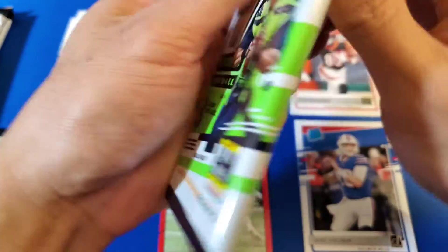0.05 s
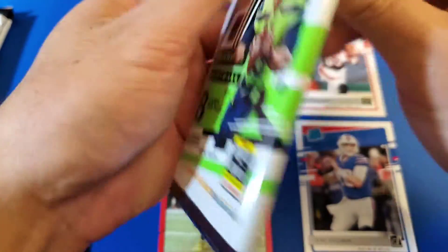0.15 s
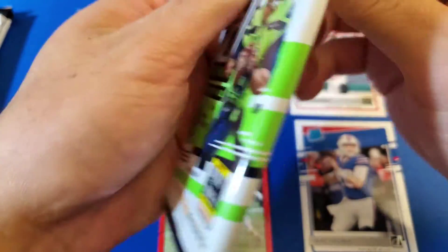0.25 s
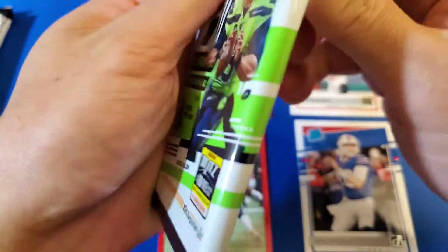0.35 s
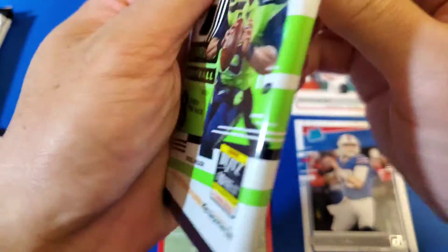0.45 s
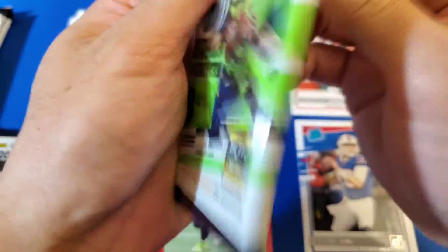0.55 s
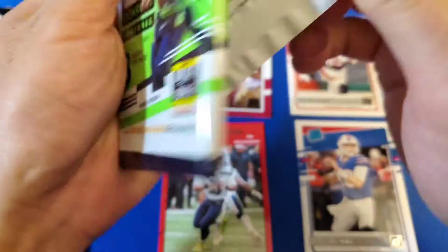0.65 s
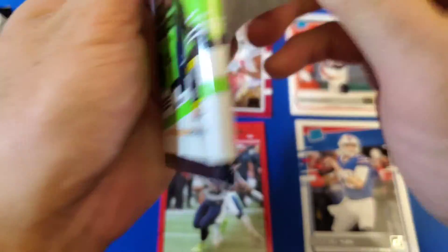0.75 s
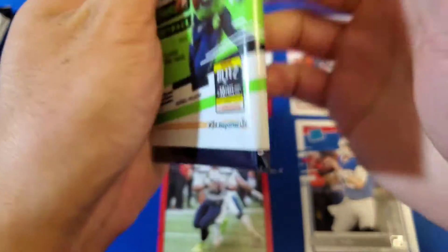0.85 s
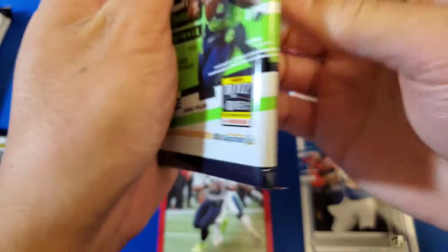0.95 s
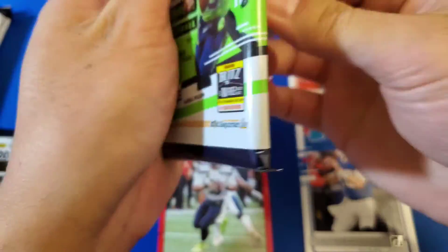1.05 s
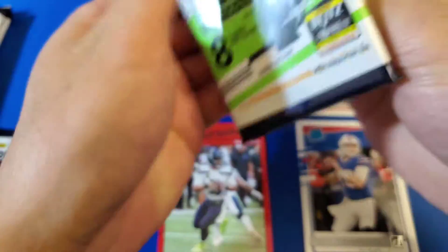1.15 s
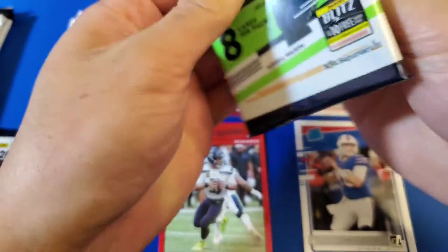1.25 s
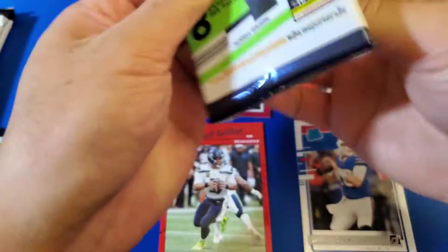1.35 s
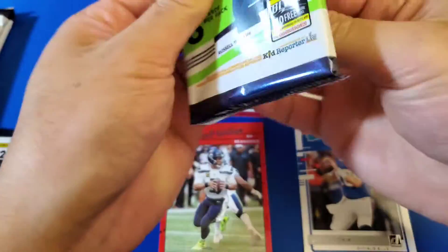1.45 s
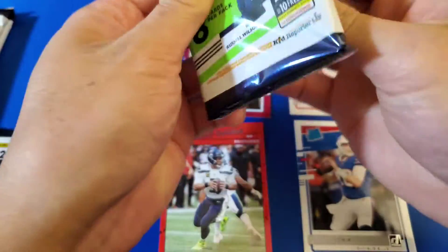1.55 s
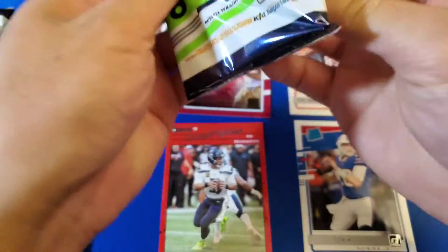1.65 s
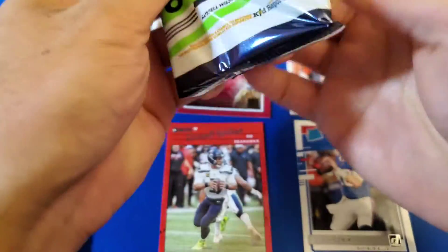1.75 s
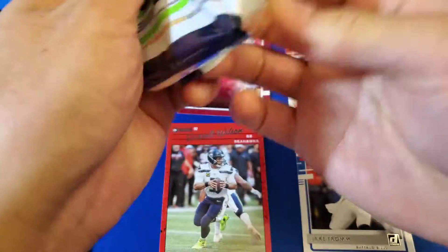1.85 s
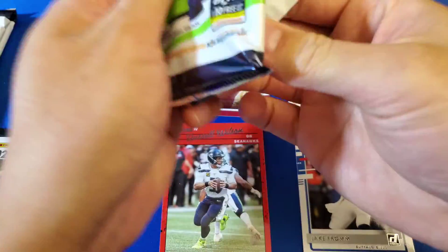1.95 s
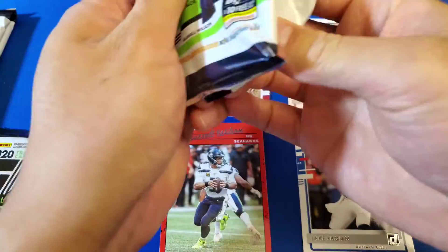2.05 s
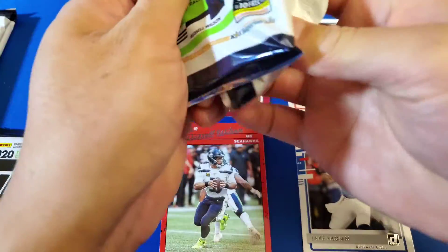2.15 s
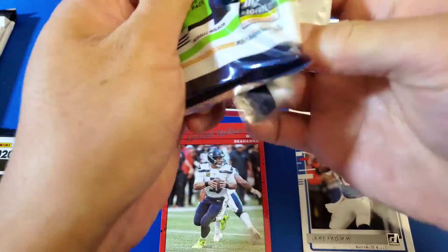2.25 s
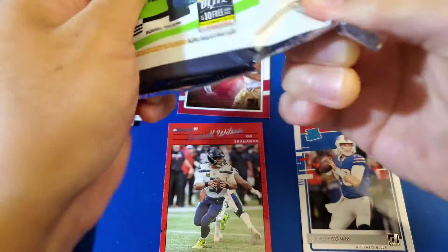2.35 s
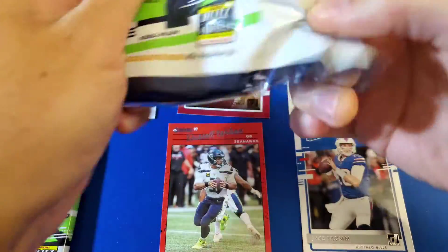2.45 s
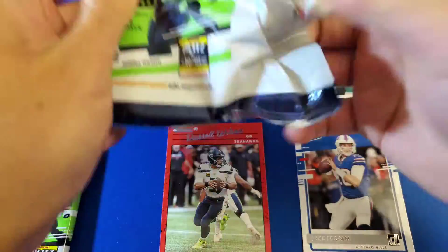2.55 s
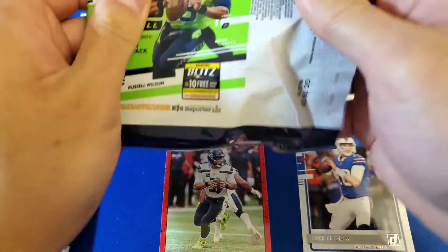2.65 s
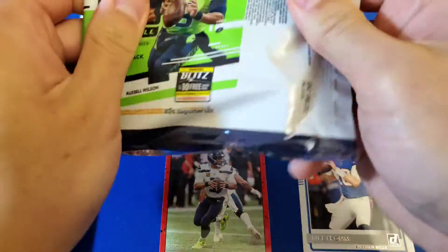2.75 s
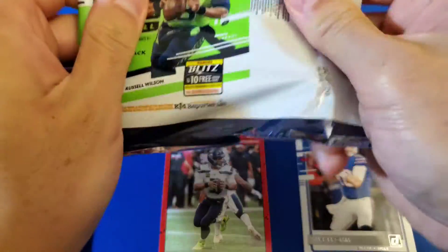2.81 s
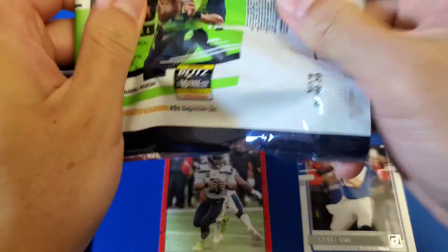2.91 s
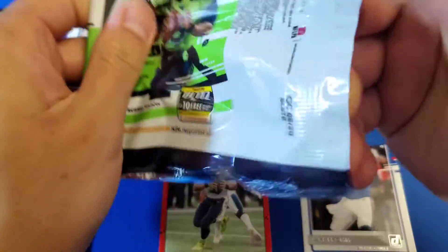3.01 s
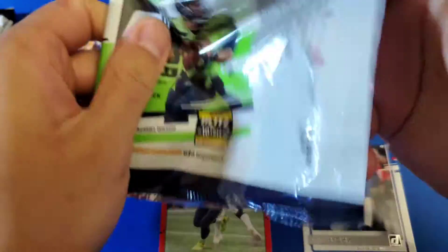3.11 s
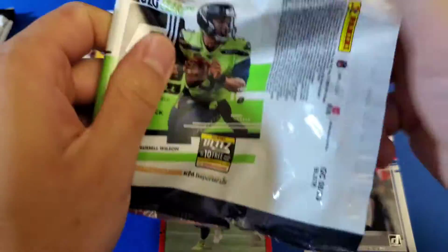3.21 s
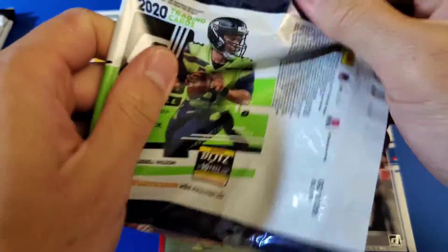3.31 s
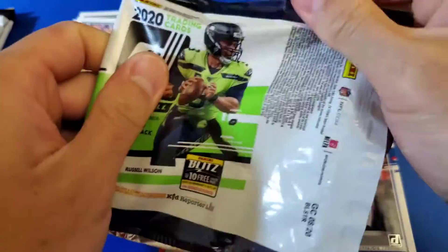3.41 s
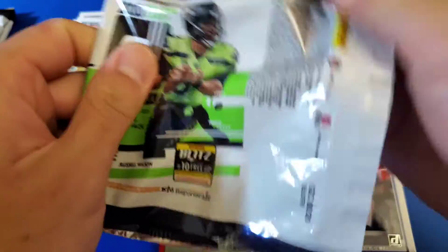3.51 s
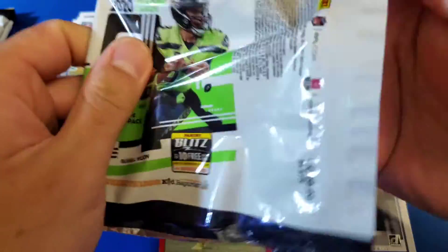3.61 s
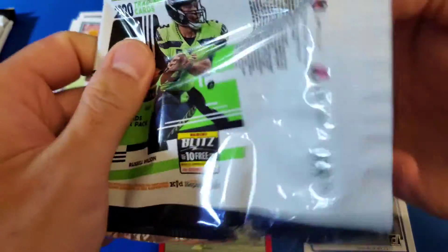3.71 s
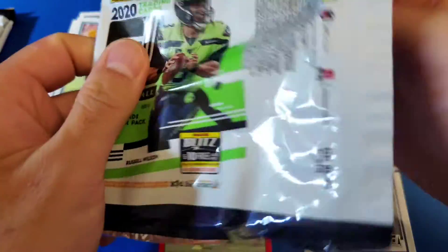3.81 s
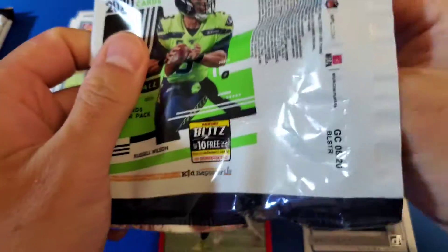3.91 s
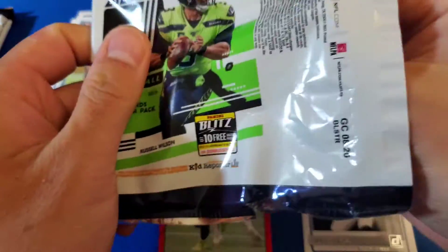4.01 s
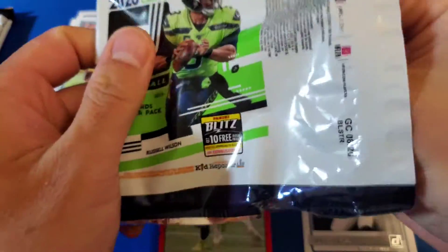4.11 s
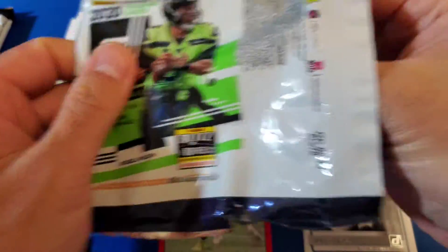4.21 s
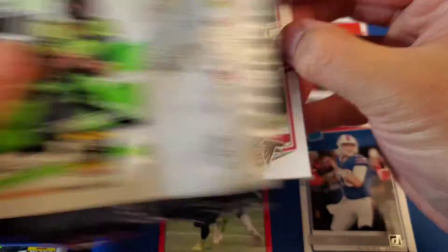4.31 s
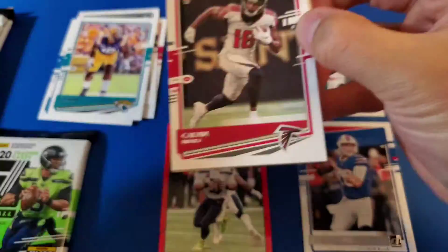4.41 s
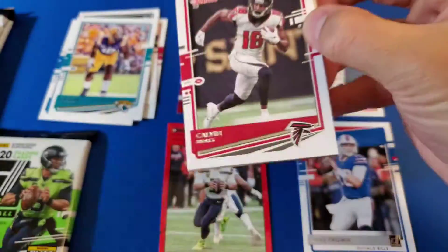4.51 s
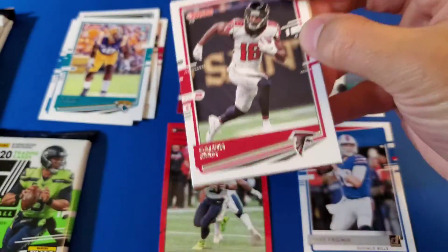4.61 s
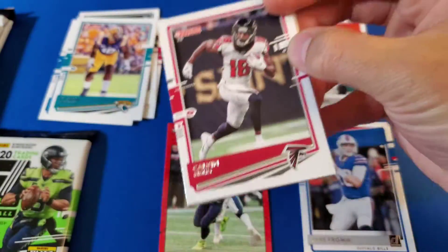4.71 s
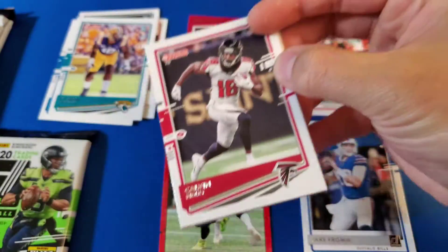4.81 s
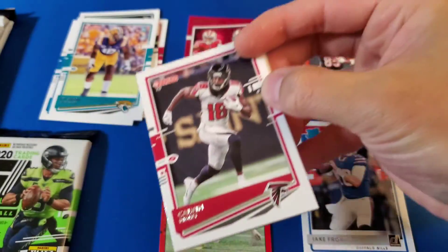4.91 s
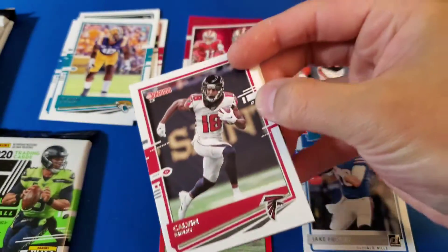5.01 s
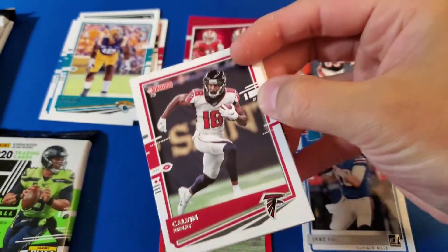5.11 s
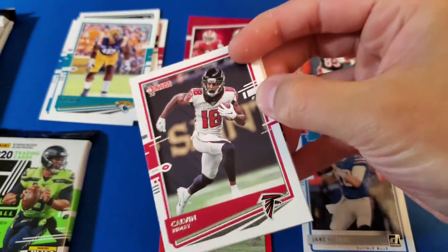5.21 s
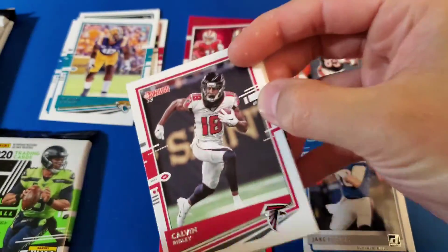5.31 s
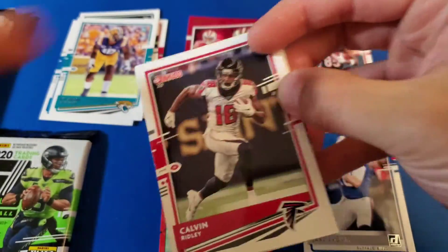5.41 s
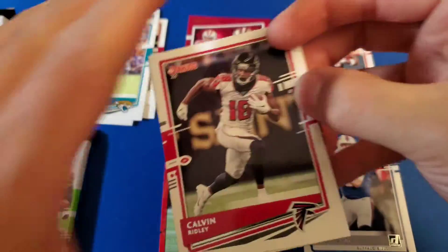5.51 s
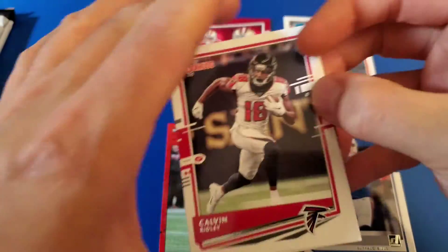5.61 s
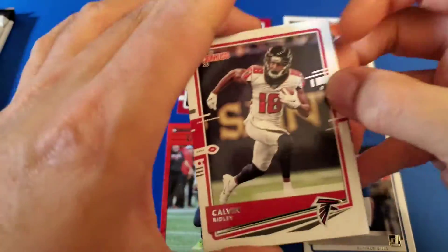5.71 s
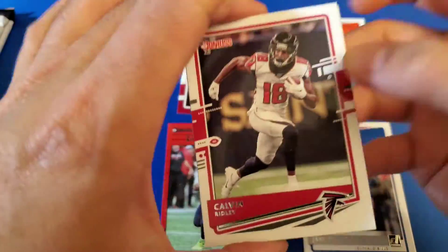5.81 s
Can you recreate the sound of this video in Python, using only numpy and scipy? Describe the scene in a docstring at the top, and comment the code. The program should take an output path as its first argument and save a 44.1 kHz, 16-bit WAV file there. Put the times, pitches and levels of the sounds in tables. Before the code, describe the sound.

Two hands turn and squeeze a foil card pack very close to the microphone, giving scattered sharp snaps and fine crackle. The crinkling thickens into ripping after two seconds, then fuller, boxier crumples as the wrapper opens. It stops around four and a half seconds; quiet finger taps on cards and a faint hand slide follow. Small dry room, low wavering hum and slight hiss.

```python
"""A foil card pack is turned, torn and spread by two hands: creases in its film buckle with sharp snaps,
each a decaying noise burst through a resonance, amid a dense crackle of random small buckles.
Each snap shoves the pack, whose modes ring briefly; bumps pass into the table. Later, fingers tap and
brush the cards and a hand slides over a mat as band-limited noise. Resonant noise and motor tones form
a low wavering hum, over faint hiss. Feedback delays make a small room; lasting loudness ducks the bass."""
import sys
import numpy as np
from scipy import signal
from scipy.fft import rfft, irfft, next_fast_len
from scipy.io import wavfile
from scipy.ndimage import uniform_filter1d

SR = 44100
rng = np.random.default_rng(int(sys.argv[2]) if len(sys.argv) > 2 else 0)


def waveform_to_disk(signal):
    """Save audio, clipped to [-1, 1], as 16-bit WAV at the path in sys.argv[1]."""
    frames = np.transpose(np.atleast_2d(signal))
    scaled = np.clip(frames, -1, 1) * 32767
    samples = np.round(scaled).astype(np.int16)
    wavfile.write(sys.argv[1], SR, samples)


N = 258469

# Levels are relative: film, pack, ports and room act on them afterwards.
# hum strength: start_s, level_db
HUM_LEVEL = [(0.0, -47.5), (0.15, -43), (0.8, -51.5), (3.1, -50), (5.81, -48.5), (5.86, -46)]
# hum resonances: pitch_hz, width_hz, level_db
HUM_TONES = [(54.6, 6.6, 4), (114.2, 7.8, -8.5), (139, 18, -13.5), (307, 63, -26)]
# hiss spectrum: frequency_hz, density_db (per Hz)
HISS_SPECTRUM = [(250, 9.5), (400, 9), (800, -1.5), (1400, -10.5), (1900, -2.5), (2800, -12), (14000, -14)]
# rising and falling crackle of handling: start_s, level_db
HANDLING_LEVEL = [(0.0, -58), (0.11, -57), (0.29, -50.5), (0.51, -45.5), (0.67, -50), (1.23, -43),
                  (2.1, -41), (2.22, -32), (2.37, -42), (2.51, -30.5), (2.81, -67), (2.97, -39.5),
                  (3.7, -45.5), (4.06, -60.5), (4.41, -46), (4.6, -94)]
# pack's share against the crackle, more booming once open: start_s, share_db
OPENING_SHARE = [(0, -17), (.9, -4), (1.5, -6.5), (2.3, -8), (2.8, 5.5), (3.6, 0), (4.6, -5.5)]
# runs of creases giving way together, as when the seam rips:
# start_s, length_s, first_db, last_db, pack_share_db (against the crackle)
RIPS = [(0.063, 0.093, -51, -36.5, -29), (0.426, 0.096, -34, -30, -38.5), (0.683, 0.067, -20.5, -14.5, -6),
        (2.374, 0.13, -22.5, -29.5, -2.5), (2.704, .05, -32.5, -28.5, -2.5),
        (2.817, 0.028, -39, -25.5, 4.5), (2.905, 0.053, -28, -44, 8.5), (3.609, 0.048, -52, -27, -7),
        (4.29, 0.067, -56, -38, -2)]
# single creases buckling: start_s, peak_db, pitch_hz, thump_db (against the snap), pan_db (left minus right)
SNAPS = [(0.0817, -29, 4300, -32, 6.5), (0.1024, -21.5, 12100, -34, 4), (0.1442, -10, 4100, -20, 1),
         (0.1556, -7, 3750, -28, 2), (0.175, -14.5, 4140, -14, -6), (0.252, -12.5, 2360, -21, -1.5),
         (0.3195, -18.5, 4630, -40, 2), (0.4098, -29.5, 5310, -27, 11), (0.4238, -15.5, 5410, -35, -6),
         (0.4453, -16, 3420, -26.5, -0.5), (0.4593, -8.5, 1904, -25, -5.5), (0.5, -1.5, 2880, -26, 7),
         (0.5139, -12, 3100, -20, -0.5), (0.5808, -19, 3000, -42, 1.5), (0.62, -29, 3150, -30.5, -6),
         (0.6789, -14.5, 3200, -36.5, -11), (0.7034, -11, 1870, -7.5, 1), (0.741, -1, 3110, -17, -1),
         (0.8258, -11.5, 9400, -23, -1), (0.8479, -10, 4330, -43, -2), (0.896, -13.5, 2880, -13, -1),
         (0.9654, -8, 1840, -15.5, 0.5), (0.9934, -15.5, 1450, -14, -6), (1.0271, -43, 2190, -24, -5),
         (1.0397, -16.5, 3400, -42, 2), (1.1184, -42, 1850, 7, -4), (1.144, -15.5, 11000, -9.5, -4.5),
         (1.1502, -21.5, 3530, -6.5, -3.0), (1.2064, -11.5, 3450, -20, -2), (1.2144, -25.5, 3140, -7, 5),
         (1.2475, -5.5, 3780, -14.5, -2.5), (1.2636, -22.5, 4010, -36, 17), (1.4107, -22, 4550, -23, 3),
         (1.4287, -19, 12300, -14, -8), (1.492, -19.5, 3680, -11, -0.5), (1.5315, -13.5, 2400, -20, 2),
         (1.5597, -16, 2760, -1, -2.0), (1.6381, -15, 2370, -6, -1), (1.7075, -20, 3440, -28.5, 5.5),
         (1.7335, -2, 1830, -13.5, 0.0), (1.7576, -8.5, 5250, -17, -1.0), (1.8568, -16, 1820, -40, -9.5),
         (1.871, -19.5, 5350, -37.5, 4), (1.8966, -16, 6390, -24, 0.5), (1.9085, -21, 6660, -22, -3),
         (1.929, -14, 9030, -32.5, 0.5), (1.94, -12.5, 3410, -15.5, 0.5), (1.964, -15, 3530, -16.5, -5.5),
         (1.9931, -5, 2610, -15, -4), (2.0566, -11, 1905, -15.5, -5.5), (2.1253, -24, 1800, -33.5, -1),
         (2.143, -2.5, 1780, -15, 2), (2.171, -13.5, 9390, -22, 0), (2.1846, -12, 9440, -20.5, -7),
         (2.195, -20, 9040, -21, -9), (2.2169, -12, 7660, -12, 0), (2.2389, -7, 4560, -19.5, -6.5),
         (2.2744, -19.5, 3120, -10.5, -1.5), (2.316, -22, 5590, -24, -1.5), (2.3478, -12, 9390, -20, -3.5),
         (2.371, -11, 2250, -31.5, -1), (2.3904, -6, 4540, -19, 4), (2.4108, -3, 2660, -21, -6.5),
         (2.4435, -8.5, 1820, -19, 3.5), (2.4527, -2, 6090, -13.5, -1.5), (2.5247, -3, 8840, -17, -0.5),
         (2.5727, -15, 2570, -13.5, 1), (2.5889, -13.5, 7530, -25.5, -0.5), (2.6418, -30, 6620, 5.5, 0.5),
         (2.6678, -18, 6200, -21, 1), (2.7085, -3, 3150, -5, 4), (2.7264, -26, 2970, -17, -2),
         (2.7417, -8, 2510, -10.5, 0.5), (2.8212, -7, 2550, -9, -1), (2.8403, -8, 12500, -29.5, -1),
         (2.8462, -10, 4410, -16.5, 5.5), (2.8617, -9.5, 2460, -16.5, 1), (2.8854, -29.5, 3490, -13.5, 4),
         (2.909, -2.5, 4330, -8.5, 2), (2.9368, -13, 3410, -9, 6.5), (2.9557, -12, 5120, -23, 3.5),
         (2.9721, -13, 2520, -9.5, 3), (2.9935, -23.5, 1950, -15, 0), (3.046, -24.5, 4060, -18.5, 16.5),
         (3.057, -17, 6710, -28.5, 0), (3.0749, -11, 2730, -32.5, 1.5), (3.1038, -3.5, 4820, -20.5, -9),
         (3.1264, -15, 2580, -26.5, 4.5), (3.1663, -6.5, 2430, -15.5, 1), (3.1873, -10.5, 6080, -18.5, 8),
         (3.2123, -12.5, 9680, -26, 1.5), (3.241, -12, 3610, -32.5, -3), (3.2619, -17, 2460, -28.5, -6),
         (3.3704, -12.5, 2900, -26, 0.5), (3.4053, -1.5, 5170, -13.5, -2), (3.4129, -5, 3500, -11.5, -0.5),
         (3.4236, -10.5, 3650, -24.5, -0.5), (3.47, -13.5, 2690, -9.5, 3.0), (3.48, -3.5, 13000, -18, 0.5),
         (3.493, -6, 2750, -14.5, 0.5), (3.5134, -27, 2320, -30, -1.5), (3.5359, -14, 2610, -25, -2),
         (3.6101, -12, 2610, -13.5, 5), (3.653, -16.5, 2060, -11, 6), (3.6796, -12.5, 4100, -30, -4),
         (3.7544, -7.5, 3640, -50, 0.0), (3.7863, -13.5, 1960, -37, 5.5), (3.7962, -18.5, 1820, -16, 3.5),
         (3.8352, -8.5, 3430, -10.5, 1.5), (3.9673, -16, 3590, -17.5, -2.5), (4.146, -39.5, 6700, -32, 16),
         (4.2541, -20.5, 8500, -30, 2), (4.304, -19, 8620, -21, 7), (4.3944, -18, 1600, -3.5, -2),
         (4.4054, -17.5, 3180, -7, 7), (4.4258, -30, 3530, -17, 5), (4.4621, -8.5, 5100, -15, -2.5)]
# radiation spectrum of the film: frequency_hz, density_db (per Hz)
FILM_SPECTRUM = [(120, -40.5), (200, -17.5), (940, -4.5), (1650, -6.5), (1840, -0.5), (2020, -3),
                 (3120, -2), (7220, -4.5), (8820, -2), (14200, -3.5), (15500, -9.5)]
# modes of the pack: pitch_hz, width_hz, level_db
PACK_MODES = [(235.8, 121, -6), (543, 270, -3), (730, 326, 0.5), (944, 180, -1), (1286, 190, -8.5),
              (2010, 37, -26.5)]
# share of the jolting that reaches the table: start_s, share_db
TABLE_SHARE = [(0, -8), (2.4, -17), (2.7, 4.5), (3.9, 4.5), (4.5, 3)]
# fingers meeting the loose cards: start_s, tap_peak_db, tap_pitch_hz, brush_db, brush_length_s
TOUCHES = [(4.618, -39.5, 6240, -61, 0.049), (4.689, -47.5, 1760, -81, .02), (4.79, -57, 4220, -70, 0.093),
           (5.018, -42.5, 3150, -57.5, 0.009), (5.138, -44, 4260, -65, 0.09),
           (5.235, -42.5, 6400, -64.5, 0.11), (5.678, -27.5, 1690, -46.5, .01)]
# hand sliding in over the mat: start_s, level_db
SLIDE_LEVEL = [(5.4, -81), (5.5, -64.5), (5.66, -57.5), (5.86, -67)]
# bands of the slide: centre_hz, width_hz, level_db (each pass of two)
SLIDE_BANDS = [(530, 300, 2), (1800, 1100, 1)]

HISS_DB = -66
SNAP_T60_S, GRAIN_T60_S, SHOVE_T60_S = 0.022, 0.015, 0.026
BURST_SAMPLES = 1024
KICK_DB, KICK_S = 10, 0.0009  # the flip itself stands above the rattle
MAX_PORT_LAG_S = 0.0006
SETTLE_DB, SETTLE_DB_PER_S = -27.5, 299.5  # rustle after a snap, against its level
RIP_RISE_DB_PER_S, RIP_FALL_DB_PER_S = 3000.5, 700
TAP_THUMP_DB, TAP_PAN_DB = -38, 4
BRUSH_FALL_DB_PER_S, BRUSH_SHARE_DB = 145.5, -3
GRIP_DB = 8.5  # weight of the crackle's shaking among the low bumps
ROOM_T60_S, ROOM_DB, WALL_CUT_HZ = 0.21, -15.5, 1900
PORTS_ALIKE_BELOW_HZ = 410
SUPPRESS_ABOVE_DB, SUPPRESS_DEPTH_DB, SUPPRESS_BELOW_HZ = -25, 42, 290
CUTOFF_HZ = 16900


def from_db(db):
    """Logarithmic level: 20 dB is a tenfold amplitude."""
    return 10 ** (np.asarray(db) / 20)


def rms_one(x):
    """Normalisation by effective value: the rms becomes 1."""
    return x / np.sqrt(np.mean(x ** 2) + 1e-20)


def gain_curve(rows):
    """Linear interpolation of level in dB over time, given as a gain per sample."""
    start_s, level_db = np.transpose(rows)
    return from_db(np.interp(np.arange(N) / SR, start_s, level_db))


def drift(rate_hz):
    """Low-pass random fluctuation of rms 1: noise through two equal poles, run at one value per 40 samples."""
    r = np.exp(-2 * np.pi * rate_hz * 40 / SR)
    noise = rng.standard_normal(N // 40 + 2002)
    slow = signal.lfilter([1], [1, -2 * r, r * r], noise)[2000:]  # start-up left out
    return np.interp(np.arange(N) / 40, np.arange(len(slow)), rms_one(slow))


def resonance(x, hz, width_hz):
    """Damped resonator: a pole pair whose radius sets the bandwidth, with about unit gain at its peak."""
    r = np.exp(-np.pi * width_hz / SR)
    zeros = np.array([1, 0, -1]) * (1 - r * r) / 2
    return signal.lfilter(zeros, [1, -2 * r * np.cos(2 * np.pi * hz / SR), r * r], x)


def modes(x, table):
    """Modal superposition: parallel resonators with alternating signs."""
    total = 0
    for k, (hz, width_hz, level_db) in enumerate(table):
        total = total + (-1) ** k * from_db(level_db) * resonance(x, hz, width_hz)
    return total


def colour(x, spectrum, size=4096):
    """Minimum-phase filtering: folding the cepstrum onto positive time makes the response causal."""
    hz, db = np.transpose(spectrum)
    grid = np.maximum(np.arange(size // 2 + 1) * SR / size, 1)
    log_gain = np.log(from_db(np.interp(np.log(grid), np.log(hz), db)))
    cepstrum = irfft(log_gain)
    cepstrum[1:size // 2] *= 2
    cepstrum[size // 2 + 1:] = 0
    response = irfft(np.exp(rfft(cepstrum)))
    return signal.fftconvolve(x, response[None], axes=1)[:, :N]


def highpass(x, order, hz):
    """Butterworth high-pass: maximally flat above its corner."""
    return signal.sosfilt(signal.butter(order, hz, "high", fs=SR, output="sos"), x)


def hum():
    """Resonant noise excitation: narrow low bands with wavering sine motor tones on the first two."""
    mid, side = rng.standard_normal((2, N))
    pair = mid + 0.3 * side * [[1], [-1]]  # nearly alike at both ports
    wider = [(hz, 3 * width_hz, 0) for hz, width_hz, level_db in HUM_TONES]
    tones = modes(modes(pair, HUM_TONES), wider)
    t = np.arange(N) / SR
    motor = from_db(-7 + 2 * drift(2.1)) * np.sin(2 * np.pi * HUM_TONES[1][0] * t)
    motor += from_db(-12 + 1.1 * drift(2.2)) * np.sin(2 * np.pi * HUM_TONES[0][0] * t)
    return gain_curve(HUM_LEVEL) * (rms_one(tones) + motor) * from_db([[0.8], [-0.8]])


def hiss():
    """Stationary coloured noise, independent at each port."""
    noise = colour(rng.standard_normal((2, N)), HISS_SPECTRUM)
    return from_db(HISS_DB) * rms_one(highpass(noise, 2, 330))


def buckle(hz, pan_db, t60, broad=0.39, alike=0.37, cycles=3.75):
    """Snap-through instability: a crease flips, its dying rattle tuned by the size of its facet."""
    shared, left, right = rng.standard_normal((3, BURST_SAMPLES))
    n = np.arange(BURST_SAMPLES)
    fade = from_db(-60 * n / (t60 * SR))
    fade *= from_db(KICK_DB * np.exp(-n / (KICK_S * SR)))
    pair = alike * shared + np.sqrt(1 - alike ** 2) * np.array([left, right])
    pair *= fade
    pair = broad * pair + resonance(pair, min(hz, 0.4 * SR), hz / cycles)
    far = int(pan_db > 0)  # the quieter port is the farther one
    pair[far] = np.roll(pair[far], int(rng.uniform(0, MAX_PORT_LAG_S * SR)))
    return pair / np.abs(pair).max() * from_db([[pan_db / 2], [-pan_db / 2]])


def crackle(strength, shaking, per_s, spread_db, clumping_db, count):
    """Clumped random impulse process: small creases flip over many facets, most faint, a few loud."""
    heights = from_db(spread_db * np.minimum(rng.exponential(1, N), 4))
    chance = per_s * from_db(clumping_db * drift(40)) / SR
    flips = heights * rng.choice([-1, 1], N) * (rng.random(N) < chance)
    facet = rng.integers(0, count, N)
    film = np.zeros((2, N))
    for k, hz in enumerate(np.geomspace(1700, 12500, count)):
        rattle = buckle(hz, rng.normal(0, 1.7), GRAIN_T60_S)[:, :400]
        film += signal.oaconvolve((flips * (facet == k))[None], rattle, axes=1)[:, :N]
    return strength * rms_one(film), from_db(9.5) * shaking * rms_one(flips)


def handling():
    """Amplitude modulation: strength of the loose crackle and of its shaking of the pack."""
    held = np.arange(N) < HANDLING_LEVEL[-1][0] * SR
    strength = gain_curve(HANDLING_LEVEL) * held
    return strength, strength * gain_curve(OPENING_SHARE)


def burst(start_s, length_s, first_db, last_db, fall_db_per_s):
    """Exponential envelope: a steep rise, a glide from first to last level, then decay."""
    t = np.arange(N) / SR - start_s
    held_db = np.interp(t, [0, length_s + 1e-6], [first_db, last_db])
    rise_db = RIP_RISE_DB_PER_S * np.minimum(t, 0)
    fall_db = fall_db_per_s * np.maximum(t - length_s, 0)
    return from_db(held_db + rise_db - fall_db)


def rips():
    """Cascading failure: strength of runs of creases giving way, and of their shaking."""
    strength, shaking = np.zeros((2, N))
    for start_s, length_s, first_db, last_db, share_db in RIPS:
        gain = burst(start_s, length_s, first_db, last_db, RIP_FALL_DB_PER_S)
        strength += gain
        shaking += gain * from_db(share_db)
    return strength, shaking


def snaps():
    """Impulsive excitation: loud creases and taps rattle, and each gives the pack a short shove."""
    film, jolts = np.zeros((2, N + BURST_SAMPLES)), np.zeros(N + BURST_SAMPLES)
    shove_fade = from_db(-60 * np.arange(BURST_SAMPLES) / (SHOVE_T60_S * SR))
    taps = [(s, db, hz, TAP_THUMP_DB, TAP_PAN_DB) for s, db, hz, *brush in TOUCHES]
    for start_s, peak_db, hz, thump_db, pan_db in [*SNAPS, *taps]:
        at = round(start_s * SR)
        span = slice(at, at + BURST_SAMPLES)
        film[:, span] += from_db(peak_db + 3.5) * buckle(hz, pan_db, SNAP_T60_S)
        shove = rng.standard_normal(BURST_SAMPLES) * shove_fade
        jolts[span] += from_db(peak_db + thump_db + 12.5) * shove
    return film[:, :N], jolts[:N]


def settling():
    """Exponential relaxation: strength of the rustle that dies away after each snap."""
    peaks = np.zeros(N)
    for start_s, peak_db, *rest in SNAPS:
        peaks[round(start_s * SR)] = from_db(peak_db + SETTLE_DB)
    return signal.lfilter([1], [1, -from_db(-SETTLE_DB_PER_S / SR)], peaks + 1e-18)


def brushing():
    """Frictional excitation: strength of the rasp as fingers brush the cards."""
    return sum(burst(start_s, length_s, brush_db, brush_db, BRUSH_FALL_DB_PER_S)
               for start_s, tap_db, hz, brush_db, length_s in TOUCHES)


def rasping():
    """Superposed envelopes: rips, settling film and brushing drive one dense rasp and its shaking."""
    rip, rip_shaking = rips()
    settle, brush = settling(), brushing()
    shaking = rip_shaking + settle * gain_curve(OPENING_SHARE) + brush * from_db(BRUSH_SHARE_DB)
    return rip + settle + brush, shaking


def table_bumps(jolts, shakes):
    """Structure-borne transmission: jolts reach the microphone through low resonances in series."""
    push = gain_curve(TABLE_SHARE) * (jolts + from_db(GRIP_DB) * shakes) + 1e-18
    low = resonance(resonance(push, 95, 100), 130, 130)
    return low * from_db([[-2], [-11]])  # felt mostly on the left


def slide():
    """Friction noise: skin on cloth excites two broad bands, filtered twice."""
    noise = modes(modes(rng.standard_normal((2, N)), SLIDE_BANDS), SLIDE_BANDS)
    begun = np.arange(N) > SLIDE_LEVEL[0][0] * SR
    return gain_curve(SLIDE_LEVEL) * begun * rms_one(noise)


def room(x):
    """Recirculating reflections: eight feedback delays a side, duller on every round."""
    size = next_fast_len(N + SR)
    hz = np.arange(size // 2 + 1) * SR / size
    tail = np.zeros((2, len(hz)), complex)
    for k, lag_s in enumerate(rng.uniform(0.0047, 0.035, 16)):
        delay = from_db(-60 * lag_s / ROOM_T60_S) * np.exp(-2j * np.pi * hz * lag_s)
        loop = delay / (1 + 1j * hz * lag_s * 10 / WALL_CUT_HZ)  # longer paths lose more treble
        tail[k % 2] += loop / (1 - loop) * (-1) ** (k // 2)
    return irfft(rfft(x, size) * tail, size)[:, :N]


def ports(x):
    """Wavelength against spacing: long waves reach both ports alike; the left is shaded in the top treble."""
    mid, side = (x[0] + x[1]) / 2, (x[0] - x[1]) / 2
    side = highpass(side, 1, PORTS_ALIKE_BELOW_HZ)
    left = mid + side
    shaded = left - 0.62 * resonance(left, 11500, 4700)
    return np.array([from_db(1.5) * shaded, mid - side])


def suppressor(x):
    """Level-dependent filtering: lasting loud noise is taken for wind, and the bass is turned down."""
    power = uniform_filter1d(np.mean(x ** 2, 0), 132)
    short_db = 10 * np.log10(np.maximum(power, 1e-12))
    lasting_db = uniform_filter1d(short_db, int(0.035 * SR), origin=-400)  # looks slightly ahead
    cut_db = np.clip(8 * (lasting_db - SUPPRESS_ABOVE_DB), 0, SUPPRESS_DEPTH_DB)
    cut_db = uniform_filter1d(cut_db, 300)
    bass = signal.sosfiltfilt(signal.butter(2, SUPPRESS_BELOW_HZ, fs=SR, output="sos"), x)
    return x - bass * (1 - from_db(-cut_db))


def scene():
    """Linear superposition: film and pack in their room, table bumps, hum and hiss."""
    loud, jolts = snaps()
    fine, shakes = crackle(*handling(), per_s=1500, spread_db=7, clumping_db=7.5, count=14)
    rasp, tugs = crackle(*rasping(), per_s=6000, spread_db=4.5, clumping_db=2.5, count=10)
    film = from_db(3.5) * colour(loud + fine + rasp, FILM_SPECTRUM)
    pack = modes(jolts + shakes + tugs + 1e-18, PACK_MODES)
    near = film + pack + slide()
    airborne = ports(near + from_db(ROOM_DB) * room(near))
    return airborne + table_bumps(jolts, shakes) + hum() + hiss()


def record(dry):
    """Saturation and band limiting: bass ducking, rounded peaks, a treble step near 15 kHz, then a cutoff."""
    rounded = 0.9 * np.tanh(suppressor(dry) / 0.9)
    stepped = signal.sosfilt(signal.cheby2(6, 20, 15100, fs=SR, output="sos"), rounded)
    return signal.sosfilt(signal.cheby2(14, 90, CUTOFF_HZ, fs=SR, output="sos"), stepped)


dry = scene()
out = record(dry)
waveform_to_disk(out)
```